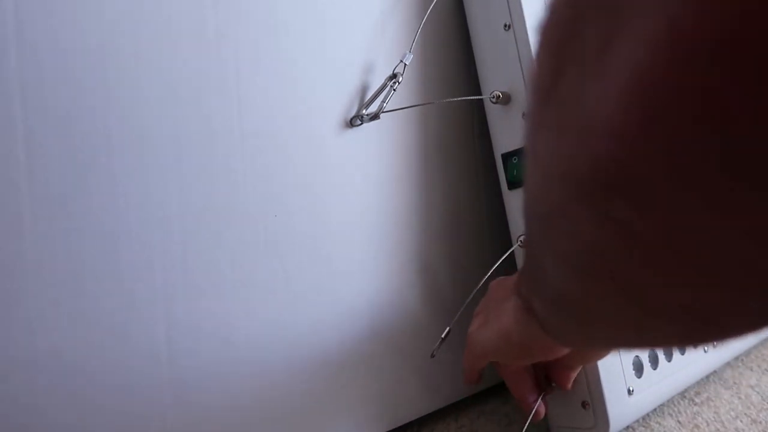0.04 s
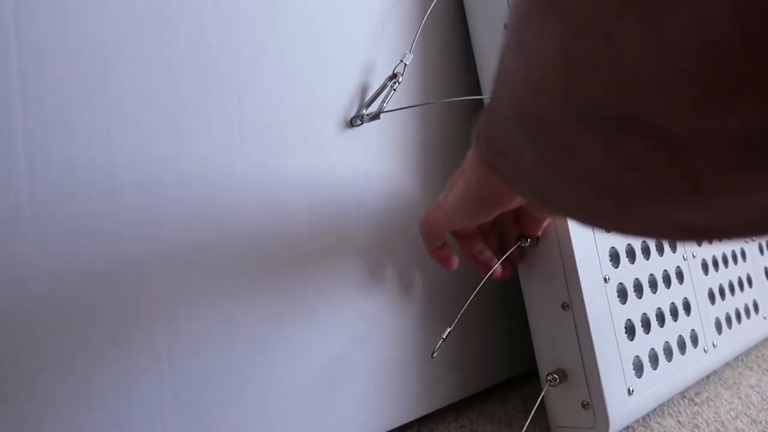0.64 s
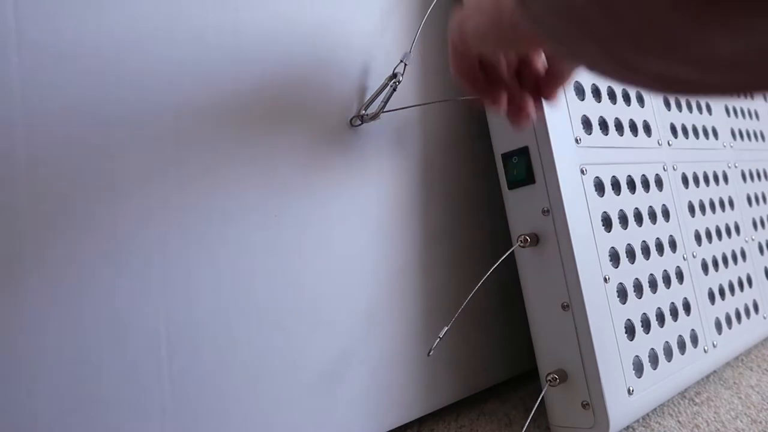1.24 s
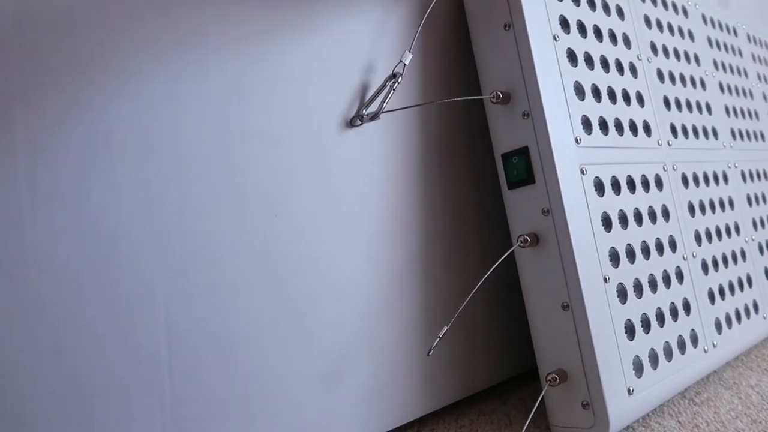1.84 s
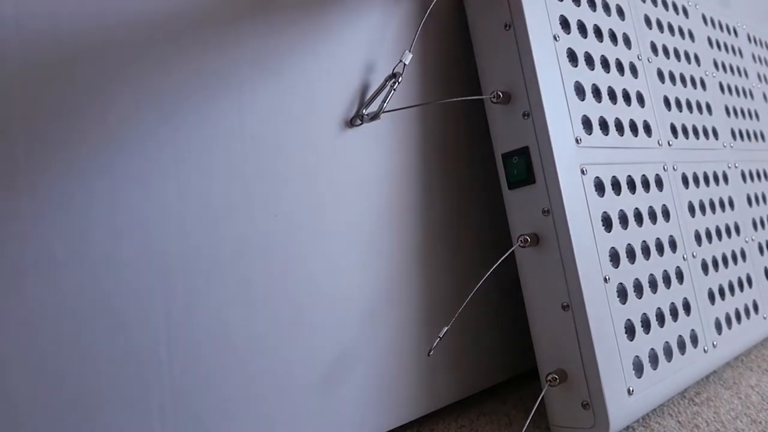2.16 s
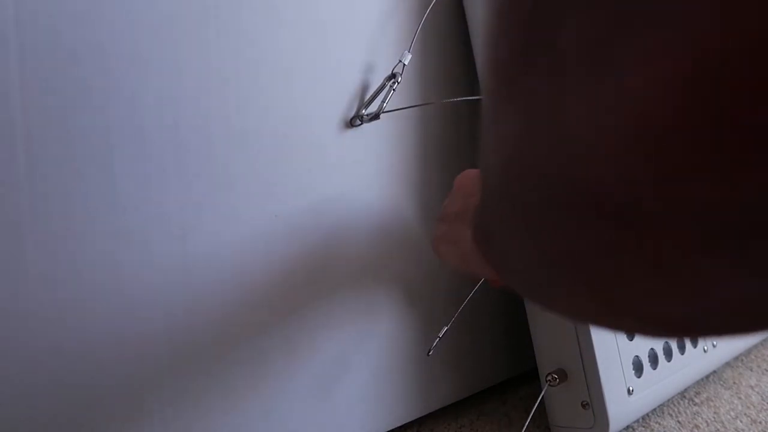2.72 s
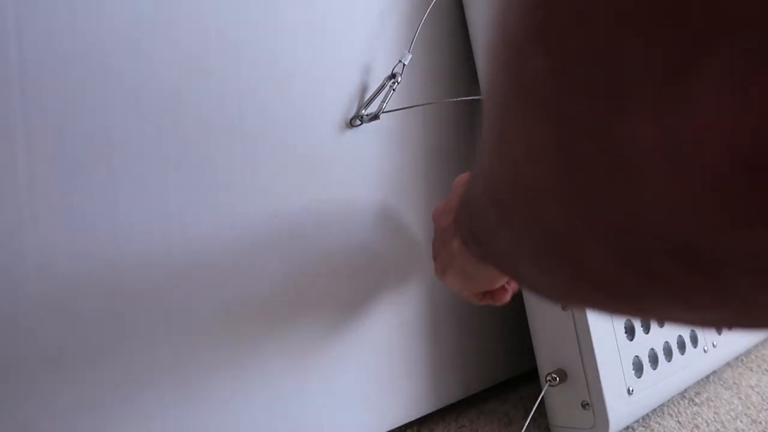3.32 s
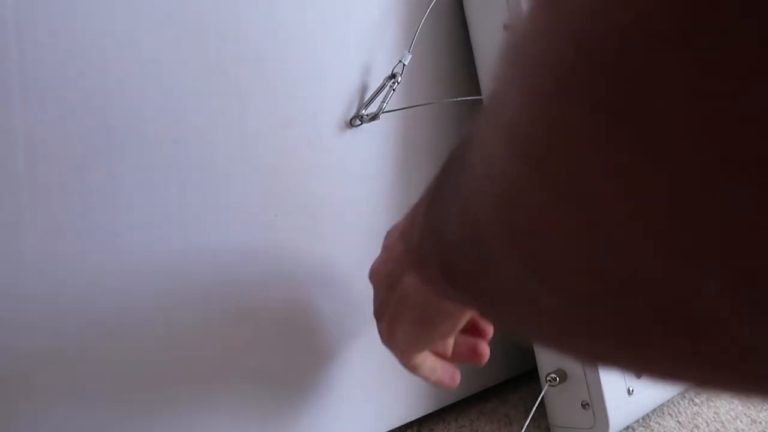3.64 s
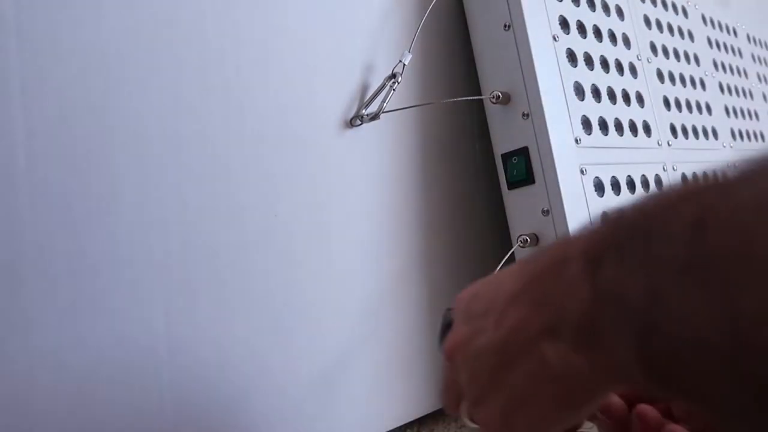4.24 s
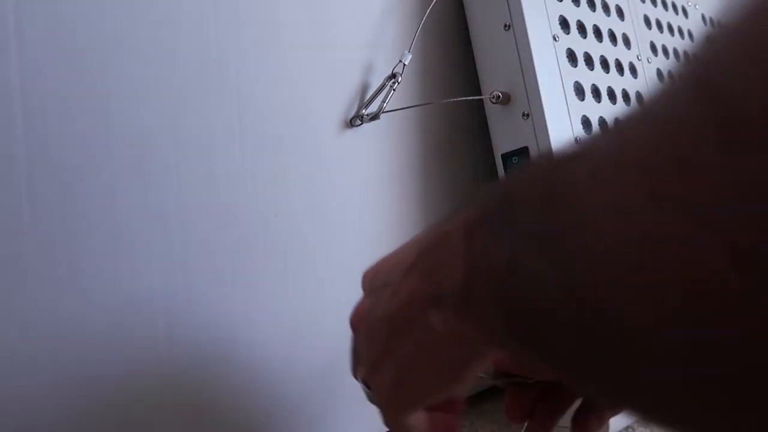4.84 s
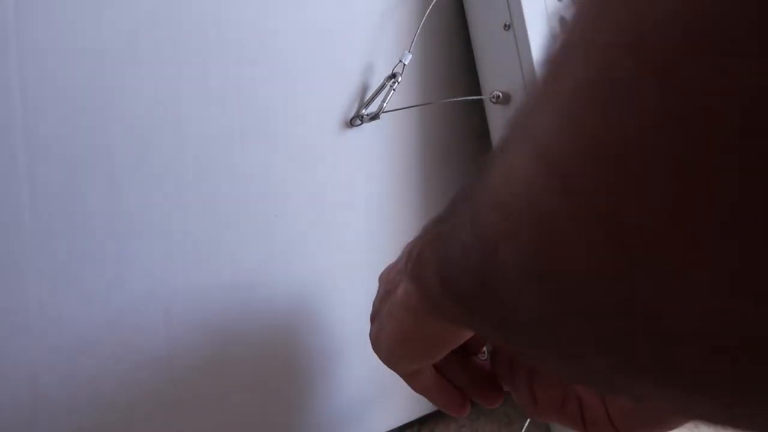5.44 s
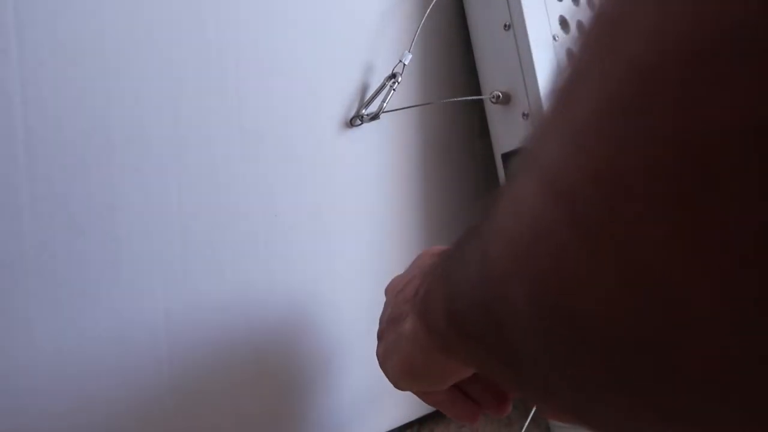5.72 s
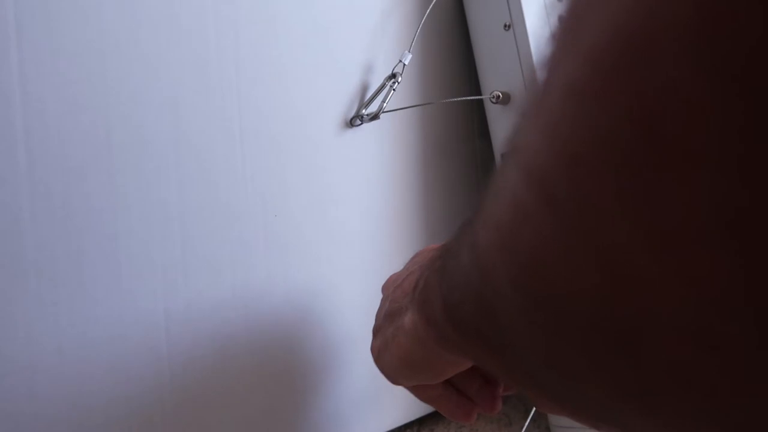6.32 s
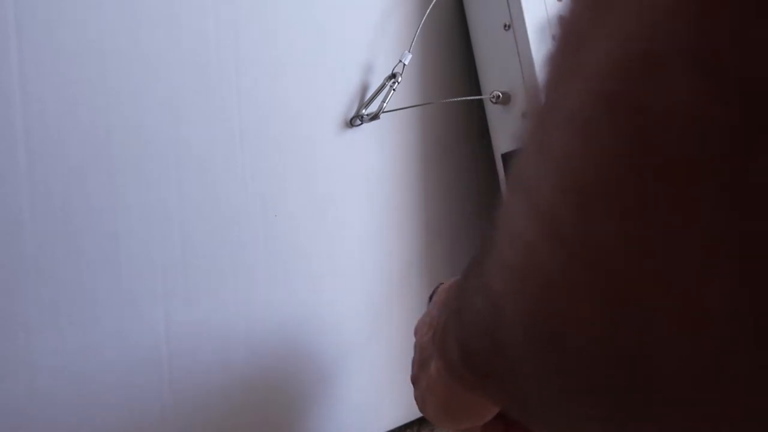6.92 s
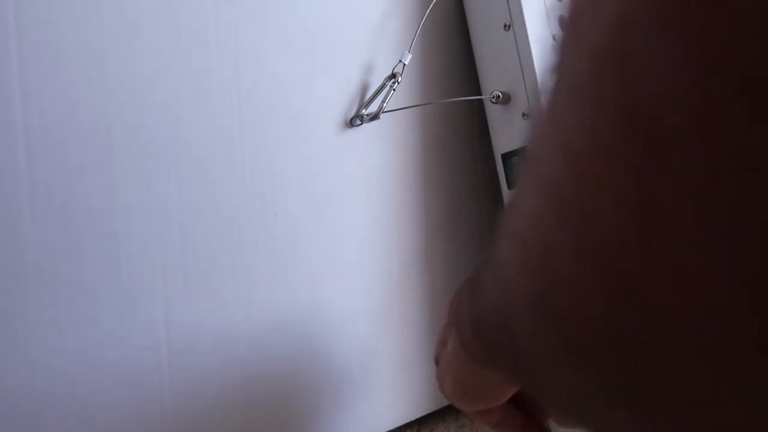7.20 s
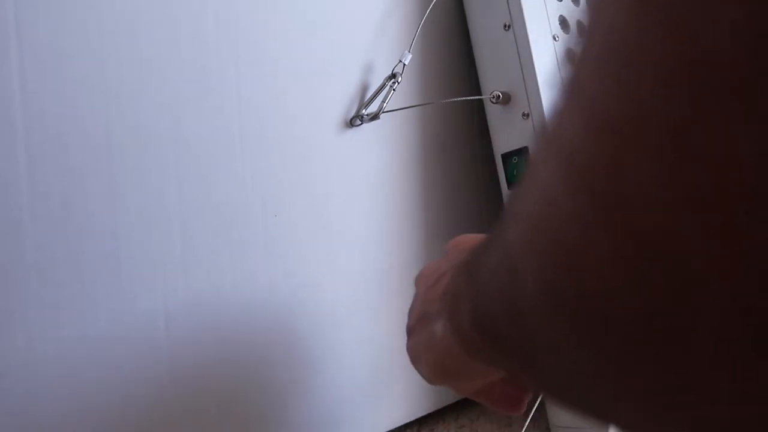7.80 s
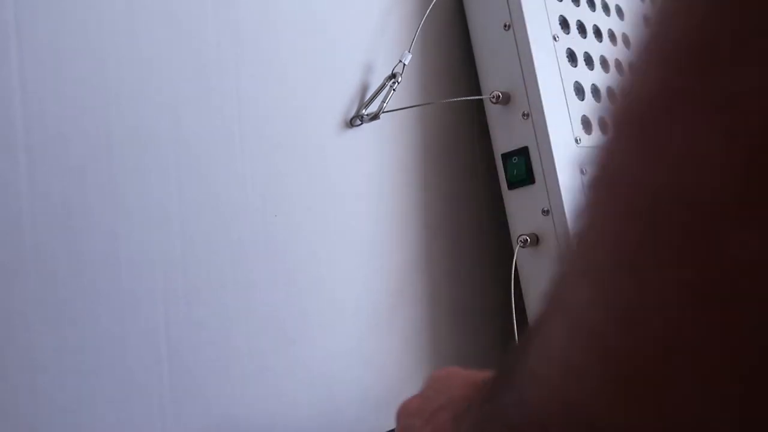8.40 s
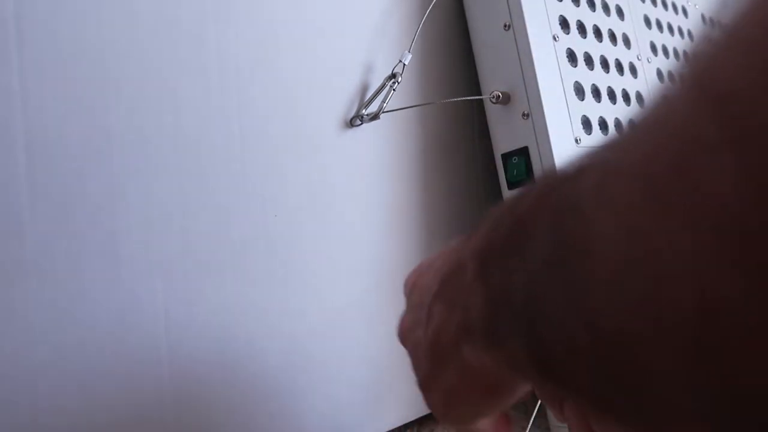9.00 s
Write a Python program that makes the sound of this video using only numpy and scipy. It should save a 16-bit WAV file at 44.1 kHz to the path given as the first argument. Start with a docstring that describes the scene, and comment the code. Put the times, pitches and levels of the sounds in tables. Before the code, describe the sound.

Close by in a small room, steel fittings tap lightly on a metal lamp housing and a link knocks against a hollow wall. A short cluster of clinks and scrapes ends with a finger squeak. The loudest sound follows: one sharp, bright, briefly ringing carabiner snap. Then the fittings keep ticking and knocking unevenly on the sheet metal. A sleeve rustles softly, with faint hiss and far traffic rumble underneath.

```python
"""Steel cables on a lamp housing

Steel cables are clipped to a sheet-metal lamp housing that leans on a wall in a small room.
Their fittings knock and scrape on it and make it ring, small steel parts tick, and a finger squeaks.
A link bumps the hollow wall, and one springy carabiner gate snaps shut close by.
A sleeve rustles; under it all lie room hiss and a low rumble like far traffic."""
import sys
import numpy as np
from scipy import signal
from scipy.fft import rfft, irfft, next_fast_len
from scipy.io import wavfile
from scipy.ndimage import uniform_filter1d, map_coordinates

SR = 44100
rng = np.random.default_rng(int(sys.argv[2]) if len(sys.argv) > 2 else 0)


def persist_wave(psi):
    """Save psi, clipped to +-1, as 16-bit WAV."""
    counts = np.round(np.clip(psi, -1, 1) * 32767).astype(np.int16)
    wavfile.write(sys.argv[1], SR, np.atleast_2d(counts).T)


N = 403515
RING_TIME = np.arange(12288) / SR  # the clock of one short sound, in seconds

# Levels are relative. A mode is one tone an object rings with; t60 is its time to fade by 60 dB.
# Knocks on the housing. Hard ones are brighter, square ones have more punch, and each spot favours
# two tones: t/s, level/dB, hardness/dB, punch/dB, low f/Hz, high f/Hz
KNOCKS = [(.042, -53, 0, -4, 650, 2200), (.078, -51.5, 1, -7, 700, 2200),
          (.967, -43.5, -1.5, -9, 600, 2280), (1.179, -51, -20, 1, 735, 2300),
          (3.073, -49, -9, 4, 400, 1530), (3.154, -33.5, -1, -2, 875, 2300),
          (3.197, -42.5, 3, -5, 1150, 1470), (3.301, -40.5, -5, 0, 715, 2400),
          (3.339, -38.5, -9, -8, 754, 2400), (3.413, -30.5, -4.5, -9, 765, 1740),
          (3.42, -33, -20, -12, 600, 1680), (3.446, -38.5, -9, -10, 430, 2300),
          (3.494, -36.5, -1.5, -3, 960, 1640), (3.5, -36, -3, -6, 810, 1700),
          (3.56, -42.5, 5, -11, 620, 2510), (3.668, -41, -22, 4, 700, 1800),
          (3.801, -40.5, -1, -1, 597, 1420), (3.951, -47.5, 6.5, -14, 600, 1460),
          (4.035, -47, -5, 4, 705, 1440), (5.272, -39, -2.5, -2, 970, 1670),
          (5.385, -42, -11, -2, 765, 2300), (5.842, -46.5, -13, 0, 694, 2300),
          (5.999, -44.5, -1.5, -8, 935, 1650), (6.038, -33, -4.5, -5, 970, 1680),
          (6.058, -36, -6, 1, 1000, 1650), (6.078, -37, -4, 6, 917, 1400), (6.093, -40, -2, 0, 800, 2250),
          (6.279, -48.5, -7, -4, 950, 1400), (6.302, -49, 2.5, -1, 1100, 2500),
          (6.36, -34, -7, 5.5, 690, 2250), (6.377, -39.5, -14, -3, 706, 1670),
          (6.501, -41.5, -6.5, -2, 790, 2300), (6.798, -41, -9, 0, 720, 2300),
          (6.874, -46.5, -3.5, 2, 726, 1440), (7.06, -34, -1, 6.5, 940, 2380),
          (7.173, -38, -8.5, -0.5, 870, 1400), (7.31, -44.5, -10, 1, 700, 2230),
          (7.456, -34.5, -2.5, -15, 770, 1690), (7.46, -34, 5.5, -6, 563, 1650),
          (7.711, -34.5, 0, 9.5, 744, 2550), (7.855, -51, 6.5, -3, 900, 2300),
          (7.947, -36.5, -0.5, 2.5, 725, 2540), (8.021, -41, -2.5, 5, 800, 2230),
          (8.037, -39, 0, 0, 694, 2300), (8.056, -45, -3, -6, 750, 2250), (8.077, -43, 4.5, -1, 700, 1690),
          (8.095, -46, -3, 4, 850, 2250), (8.368, -38, -0.5, -2, 1100, 1870),
          (8.378, -49, 1, -1, 910, 1760), (8.484, -46, -8, -1, 655, 1400),
          (8.53, -40.5, -3, 3.5, 644, 2250), (8.548, -39.5, -2.5, -12, 1140, 1380),
          (8.734, -54, -10, -4, 900, 2230), (8.794, -49.5, -14, 4, 510, 1400),
          (9.017, -45, -17, -1, 730, 2070), (9.068, -52, -14, -6, 590, 1400),
          (9.101, -43.5, -7.5, -12, 640, 2550)]
# Drags over the housing: t/s, length/s, level/dB, hardness/dB, low f/Hz, high f/Hz
SCRAPES = [(0.035, .082, -55.5, -3, 640, 1700), (3.174, .032, -41, 3, 750, 2280),
           (3.316, .025, -48, -0.5, 750, 2400), (3.407, .022, -35.5, -2, 750, 2130),
           (3.438, .014, -43, -7, 560, 1450), (3.562, .014, -48, 8, 700, 2550),
           (3.956, .02, -45, -0.5, 700, 2300), (5.513, .012, -56.5, 3.5, 1100, 1700),
           (5.564, .02, -56.5, -1.5, 1100, 1450), (5.628, .04, -58, 6, 1100, 2280),
           (5.712, .01, -47, -6, 950, 1380), (5.737, .055, -48, -0.5, 1060, 1470),
           (6.061, .012, -33.5, -8, 560, 2230), (6.308, .045, -49, -3, 1100, 2250),
           (6.463, .029, -44.5, -12, 850, 1400), (6.804, .012, -49, 3, 720, 2130),
           (7.019, .028, -43.5, -9, 750, 1400), (7.075, .025, -41, -7, 1080, 1420),
           (7.193, .022, -41, -8, 800, 2250), (7.291, .017, -45.5, -1.5, 720, 2160),
           (7.743, .038, -42.5, 5, 900, 1730), (8.031, .09, -41.5, 0, 700, 2280),
           (8.369, .014, -37, 0.5, 523, 1840), (8.497, .03, -49, 1, 1100, 2250),
           (8.538, .028, -46.5, 2.5, 650, 2300), (8.563, .03, -58, -10, 650, 2280),
           (8.681, .07, -57, 0, 750, 2300), (8.837, .03, -46.5, 1, 700, 2290),
           (8.888, .04, -45.5, 0, 555, 2280)]
HOUSING_MODES = [(390.4, -8.5, 0.16), (447, -12, 0.17), (570.6, -13.5, 0.28), (673.4, 0.5, 0.085),
                 (742.6, 5, 0.087), (921, -3, 0.12), (1105, -12, 0.2), (1248, -10.5, 0.17),
                 (1414, -15, 0.23), (1633, -22, 0.15), (1700, -13, 0.17), (1826, -22, 0.18),
                 (2226, -10, 0.14), (2575, -8.5, 0.057)]  # the sheet metal's ring: f/Hz, level/dB, t60/s
CLATTER_SPECTRUM = [(150, -15), (300, -9), (410, -2), (520, 1), (750, 0), (1100, -3), (1480, -8),
                    (1700, -2.5), (2000, -10), (2500, -6.5), (3300, -14.5), (5000, -18.5), (8000, -21),
                    (15000, -34)]  # its crowded modes plus a fitting's click: f/Hz, level/dB
FITTING_MODES = [(.76, 2, 0.033), (0.952, -0.5, .05), (1, 0, 0.078), (1.04, -1.5, 0.046),
                 (1.22, -2.5, 0.068), (1.42, -11.5, 0.058), (1.74, -9.5, 0.05)]  # a small steel part's ring: multiple of its pitch, level/dB, t60/s

# Steel touches steel. Loose parts ring more, sharp edges sparkle:
# t/s, level/dB, ring/dB, sparkle/dB, pitch f/Hz, contact/s
TICKS = [(0.042, -71, 19, -8, 3290, 0.01), (.078, -67.5, 16.5, -8, 2790, .011),
         (1.669, -74.5, 17, -8, 3690, .004), (1.711, -74, 15, -8, 3690, .004),
         (1.789, -74, 15, -8, 3690, .004), (3.1537, -47, -17, -10, 3600, 0.013),
         (3.409, -53, 7.5, -11, 5350, 0.026), (3.421, -52.5, 8, -1, 3230, 0.022),
         (3.56, -47, 5.5, -3, 3900, 0.037), (3.801, -60, 13.5, -4, 2730, .011),
         (3.9505, -47.5, -1.5, -8, 3750, 0.011), (4.31, -75, 23, -8, 3750, .004),
         (4.351, -76, 14, -8, 3690, .004), (6.036, -62.5, 13, -10, 3500, .008),
         (6.075, -56, 4, -9, 3800, 0.013), (6.278, -57.5, -5, -4, 3400, .008),
         (6.5028, -37.5, -15, -3, 4700, 0.0033), (7.06, -46, -3, -1, 2660, 0.009),
         (7.4596, -50, 10.5, -9, 2850, 0.017), (7.682, -56, 9.5, -9, 2700, .006),
         (7.7115, -37, 4, -11, 4100, 0.01), (7.8125, -44.5, -13, -13, 4300, 0.0076),
         (7.9107, -55, -2, -3, 3600, .007), (7.9476, -43, -1.5, 0, 3800, 0.0056),
         (8.0394, -51.5, -3, -7, 4700, 0.013), (8.049, -55.5, 7, -5, 3850, 0.032),
         (8.076, -62, 9, -8, 3700, .015), (8.368, -51, 14.5, 1, 3040, .02), (8.379, -57, 12, 6, 3050, .015),
         (8.531, -62, 7, -10, 4200, .015), (8.539, -66, 16, -10, 3150, .02), (8.89, -56, 4, -7, 4300, .011)]
TICK_SPECTRUM = [(3000, 0), (5500, -1), (7000, 3), (9500, 5), (11000, 2.5), (13000, -1), (14500, -4),
                 (16000, -29)]  # the click of steel on steel: f/Hz, level/dB
EDGE_MODES = [(12200, 4, .09), (12450, -5, .07)]  # a sharp edge's thin ring: f/Hz, level/dB, t60/s

HINGE_SQUEAK = [(4.5, 9400, -95), (4.56, 9650, -80), (4.62, 9880, -80), (4.68, 10000, -78),
                (4.73, 9500, -78), (4.8, 9300, -79), (4.86, 9200, -90)]  # the carabiner gate is pressed open: t/s, f/Hz, level/dB
GATE_HITS = [(4.8991, -9.2, .00026), (4.9004, -11.3, .0003), (4.9020, -20, .0007)]  # the gate strikes and chatters: t/s, level/dB, spread/s
GATE_ECHOES = [(4.9105, -20, .00018), (4.9238, -31, .0008)]  # near surfaces return the treble: t/s, level/dB, spread/s
SNAP_SPECTRUM = [(150, -8), (450, -10.5), (900, -10.5), (1800, -17.5), (2300, -14), (3200, -25.5),
                 (4200, -4.5), (5000, -10), (5600, 0), (6500, -6.5), (8500, 4), (9800, 5.5), (11100, -9.5),
                 (13200, 5), (16000, -15)]  # the snap itself: f/Hz, level/dB
SNAP_TAIL_SPECTRUM = [(1200, -41), (1900, -16), (2200, -8), (2800, -13), (3800, -3), (5000, -6.5),
                      (5800, -2.5), (8000, 2), (9300, 1), (11200, 2.5), (13000, -7), (15300, -16)]  # the room's answer to it: f/Hz, level/dB
SNAP_BALANCE = [(200, 3), (400, 29), (700, 8), (1300, 13), (2400, 3.5), (4400, -2), (8000, -2), (15000, 0)]  # its thud is mainly on the left: f/Hz, left minus right/dB
CARABINER_MODES = [(2170, -2, 0.22), (2290, -5, 0.091), (2950, -13.5, .25), (3500, -9, 0.13),
                   (3930, -5, 0.14), (4350, -3.5, 0.13), (4759, -2, .12), (5523, 3, 0.2), (6080, -5, .22),
                   (6460, -4, .2), (6977, 3, 0.16), (7558, -3, 0.16), (8100, 1, 0.14), (8300, 0, .14),
                   (8500, 8, .14), (8840, 4, .15), (9450, 6, 0.139), (9500, 8, 0.15), (10100, -3, 0.12),
                   (13200, 10, .11)]  # the carabiner's ring: f/Hz, level/dB, t60/s

BUMPS = [(1.902, -34), (1.909, -24), (1.919, -30.5)]  # a hanging link swings against the wall: t/s, level/dB
WALL_MODES = [(410, -11.5, 0.14), (491, -20, .15), (943, -2.5, 0.16), (1011, 0, 0.051), (1093, 4, 0.072),
              (1160, -6, .04), (1225, -9, 0.19), (1378, -9, 0.17), (1450, -14, 0.16), (1624, -10, 0.19),
              (1670, -14.5, 0.22), (2430, -15, 0.079), (2720, -18, 0.059), (3750, -16, 0.045)]  # the hollow wall and the link: f/Hz, level/dB, t60/s
BOOM_MODES = [(195, -2, 0.19), (237, -1.5, 0.21), (254, -4, 0.2)]  # the wall's slow bending: f/Hz, level/dB, t60/s
FINGER_SQUEAK = [(3.84, 740, -73), (3.86, 783, -42.5), (3.875, 982, -48), (3.9, 1050, -54),
                 (3.92, 1100, -75)]  # a finger slips with a rising tone: t/s, f/Hz, level/dB
ARM_MOVES = [(0, 0.19, -52), (3.097, 0.081, -50.5), (3.625, 0.36, -51.5), (3.873, 0.25, -56.5),
             (5.66, 0.29, -76), (6.39, 0.16, -55.5), (7.11, 0.23, -60), (7.76, 0.17, -48),
             (8.085, 0.12, -54), (8.487, 0.37, -54), (8.92, 0.26, -55.5)]  # the sleeve brushes past: middle t/s, length/s, level/dB
SLEEVE_SPECTRUM = [(250, -25), (450, 5.5), (740, 5.5), (1100, -3), (1700, -2), (2400, -6.5), (3200, -11),
                   (8000, -23.5), (14000, -33.5)]  # rubbing heard through the housing: f/Hz, level/dB

# Far engines: middle t/s, length/s, firing f/Hz, glide/(Hz per s), level/dB, overtones/dB
ENGINES = [(0.283, 0.51, 58.8, 14.5, -43.5, -85), (1.3, 0.39, 60.8, -10.5, -64, -83),
           (2.6, 0.46, 110, 0, -50, -95), (5.857, 0.52, 55.4, 0, -65, -55.5),
           (7.96, 0.3, 34.15, 25.5, -43.5, -90), (8.047, 0.38, 60.6, 0, -48.5, -88),
           (9.087, .8, 65, 9.5, -45.5, -86)]
RUMBLE_SPECTRUM = [(8.8, -28), (15, -5.5), (49, -3), (110, -8), (140, -31), (240, -120)]  # the deep rumble: f/Hz, level/dB
ROOM_TONE_SPECTRUM = [(44, -33), (75, -5.5), (113, -1.5), (140, -10), (189, -8), (243, -11.5), (289, -10),
                      (323, -15.5), (399, -13.5), (600, -20.5), (780, -36), (1320, -120)]  # the room's low murmur: f/Hz, level/dB
HISS_SPECTRUM = [(200, -29), (400, -27), (700, -8), (1200, -9.5), (2000, -12), (3000, -14), (4200, -16),
                 (5000, -18.5), (8000, -23.5), (12500, -29), (13200, -27.5), (15000, -56)]  # the room's hiss: f/Hz, level/dB
ROOM_DECAY = [(200, 0.17), (600, 0.21), (1500, 0.25), (4000, 0.17), (10000, 0.23), (14000, 0.17)]  # how long the room echoes: f/Hz, t60/s

# How alike left and right are for sound from each direction: f/Hz, likeness (-1 opposite, 1 same)
ALL_AROUND = [(50, 1), (100, .98), (180, .9), (270, .6), (500, -.05), (3000, -.15), (9000, -.15),
              (13000, -.5)]
IN_FRONT = [(300, 0.9), (700, 0.98), (1600, 0.92), (3000, 0.78), (5500, 0.63), (8000, 0.42), (12000, 0.11)]
TO_THE_SIDE = [(300, 0.97), (900, 0.3), (2100, 0.37), (3000, -0.38), (4000, 0.98), (5200, 0.92),
               (6500, 0.12), (8000, -0.14), (9500, -0.72), (13000, -0.72)]


def knocks(gain_db=-0.63, graze_db=-17, graze_s=0.003):
    """A fitting grazes the housing, lands on it and slides for a moment."""
    out = np.zeros((2, N))
    lead = round(graze_s * SR) + 1
    for t, level, hardness, punch_db, low_hz, high_hz in KNOCKS:
        force = np.pad(landing_force(), ((0, 0), (lead, 0)))
        force[0, 0] = amp(graze_db)
        add(out, t - .001 - lead / SR, ring_housing(force, level + gain_db, hardness, low_hz, high_hz))
        add(out, t, amp(level + gain_db + punch_db) * punch(low_hz))
    return out


def landing_force(slide_s=0.005006, slip_db=-13, slips=4):
    """One push as the fitting lands, then a few weaker slips."""
    force = np.zeros(SR // 20)
    slip_times = rng.uniform(size=slips) * slide_s
    force[(slip_times * SR).astype(int)] = amp(slip_db) * rng.choice([-1, 1], slips)
    force[0] = 1
    return force[None]


def punch(hz):
    """The struck spot of sheet metal swings for a few cycles."""
    return unit_peak(np.sin(2 * np.pi * hz * RING_TIME) * fade(0.017) * rise(0.0005))


def ring_housing(force, level, hardness, low_hz, high_hz, clink_db=-12):
    """A force rings the housing and the fitting; a harder contact brings out their high tones."""
    onset = rise(0.0021)
    contact = noise(CLATTER_SPECTRUM, IN_FRONT) * fade(0.019)
    contact += amp(-16) * room_tail(CLATTER_SPECTRUM, IN_FRONT, build_s=.004)
    housing = contact + amp(-10) * ring(HOUSING_MODES, scatter_db=4.5, detune=.005)
    fitting = unit_rms(band(contact, 2590, "high"))
    fitting += amp(-7) * fitting_ring(hz=3148, scatter_db=0.5, detune=.04)
    housing = signal.fftconvolve(housing * onset, force, axes=1)
    fitting = signal.fftconvolve(fitting * onset, force, axes=1)
    body = unit_peak(band(resonate(housing, low_hz), 1300, "low"))
    clack = unit_peak(band(resonate(housing, high_hz), [1300, 2800], "band"))
    # The spot's favoured high tone sings on after the clack.
    singing = ring([(high_hz, 0, 0.11)], scatter_db=0) * onset
    singing = signal.fftconvolve([singing], force, axes=1)
    clack = unit_peak(clack + amp(-22) * unit_peak(singing))
    clink = unit_peak(band(fitting, 6000, "low"))
    return amp(level) * (body + amp(hardness) * (clack + amp(clink_db) * clink))


def fitting_ring(hz, scatter_db, detune):
    """A small steel part rings with several tones around its pitch."""
    modes = [(multiple * hz, db, t60) for multiple, db, t60 in FITTING_MODES]
    return unit_rms(ring(modes, scatter_db, detune))


def scrapes(gain_db=-1.23):
    """A dragged fitting or cable chatters on the housing."""
    out = np.zeros((2, N))
    for t, length, level, hardness, low_hz, high_hz in SCRAPES:
        force = drag_force(length)
        add(out, t, ring_housing(force, level + gain_db, hardness, low_hz, high_hz, clink_db=-10))
    return out


def drag_force(length_s, slips_per_s=180, scatter_db=1.5):
    """Dragged metal sticks and slips, giving pushes of uneven size at uneven times."""
    size = SR // 5
    slipping = (rng.uniform(size=size) < slips_per_s / SR) & (np.arange(size) < length_s * SR)
    strength = amp(scatter_db * rng.standard_normal(size))
    force = slipping * strength * rng.choice([-1, 1], size)
    force[0] = 1
    return force[None]


def ticks(wall_echo_s=.0114, wall_echo_db=-13):
    """Small steel parts touch: a bright click, the part's own ring and an echo off the wall."""
    out = np.zeros((2, N))
    onset = rise(0.0008)
    for t, level, ring_db, sparkle_db, hz, contact_s in TICKS:
        direct = unit_peak(noise(TICK_SPECTRUM, IN_FRONT) * (fade(contact_s) - fade(contact_s / 2)))
        room = unit_rms(room_tail(TICK_SPECTRUM, IN_FRONT, build_s=0.0058))
        touch = direct + amp(-11) * np.std(direct) * room
        tick = amp(1) * unit_peak(band(touch, [5000, 11000], "band"))
        rasp = noise(CLATTER_SPECTRUM, IN_FRONT) * fade(0.015)
        rasp += amp(-13) * room_tail(CLATTER_SPECTRUM, IN_FRONT, build_s=0.0024)
        rasp = unit_rms(resonate(band(rasp, 3100, "high"), hz))
        fitting = (rasp + fitting_ring(hz, scatter_db=-1.5, detune=0.0028)) * onset
        clink = amp(ring_db - 1) * unit_peak(band(fitting, 6000, "low", order=5))
        edge = amp(-21) * ring(EDGE_MODES, scatter_db=3, detune=.004) * onset
        sparkle = amp(sparkle_db) * (unit_peak(band(touch, 11000, "high")) + edge)
        add(out, t, amp(level) * (tick + sparkle + clink))
        add(out, t + wall_echo_s, amp(level + wall_echo_db) * (tick + sparkle))
    return out


def carabiner(ring_db=-29, room_db=-27.5, lead_s=.005):
    """The springy gate squeaks open and snaps shut; the steel and the room ring on."""
    out = np.tile(squeak(HINGE_SQUEAK, rough_db=3, rough_hz=75), (2, 1))
    for t, level, spread_s in GATE_HITS:
        add(out, t - lead_s, amp(level) * unit_peak(gate_click(spread_s, lead_s), window=44))
    for t, level, spread_s in GATE_ECHOES:
        echo = band(gate_click(spread_s, lead_s), 4000, "high")
        add(out, t - lead_s, amp(level) * unit_peak(echo, window=44))
    steel = np.array([ring(CARABINER_MODES, scatter_db=2) for side in range(2)])
    room = room_tail(SNAP_TAIL_SPECTRUM, TO_THE_SIDE, build_s=0.0035)
    add(out, GATE_HITS[0][0], amp(ring_db) * steel + amp(room_db) * room)
    return out


def gate_click(spread_s, lead_s):
    """One stereo click after lead_s, with each frequency early or late by about spread_s."""
    hz = np.fft.rfftfreq(2048, 1 / SR)
    delay_s = lead_s + spread_s * map_coordinates(rng.standard_normal(60), [hz / 500])
    sides = np.array([[1], [-1]])  # left, right
    phase = sides * stereo_angle(TO_THE_SIDE, hz) - 2 * np.pi * np.cumsum(delay_s) * hz[1]
    level = value_at(SNAP_SPECTRUM, hz) + sides * value_at(SNAP_BALANCE, hz) / 2
    return irfft(amp(level) * np.exp(1j * phase))


def wall_bumps(gain_db=-4.0, scrape_db=-10, room_db=-15, boom_db=-30):
    """A link bounces on the hollow wall, whose low boom takes a moment to build."""
    out = np.zeros((2, N))
    for t, level in BUMPS:
        wall = ring(WALL_MODES, scatter_db=3, detune=.004)
        scrape = amp(scrape_db) * noise(CLATTER_SPECTRUM, IN_FRONT) * fade(0.045)
        room = amp(room_db) * room_tail(CLATTER_SPECTRUM, IN_FRONT, build_s=0.033)
        add(out, t, amp(level + gain_db) * unit_peak((wall + scrape + room) * rise(0.00024)))
    add(out, BUMPS[1][0], amp(boom_db) * ring(BOOM_MODES, scatter_db=0) * rise(0.023))
    return out


def finger(room_db=-12):
    """Skin squeaks on the sheet metal and the room answers."""
    direct = squeak(FINGER_SQUEAK, rough_db=2.0, rough_hz=110.7)
    tail = room_tail(CLATTER_SPECTRUM, IN_FRONT, build_s=.004)
    room = signal.fftconvolve(direct[None], tail, axes=1)[:, :N]
    return direct + amp(room_db) * np.std(direct) * unit_rms(room)


def squeak(path, rough_db, rough_hz):
    """Sticking and slipping makes a gliding tone, unsteady in level and pitch."""
    times, pitches, levels = np.transpose(path)
    now = np.arange(N) / SR
    level = np.interp(now, times, levels) + rough_db * wobble(90)
    hz = np.interp(now, times, pitches) + rough_hz * wobble(300)
    sounding = (now > times[0]) & (now < times[-1])
    return amp(level) * np.sin(2 * np.pi * np.cumsum(hz) / SR) * sounding


def sleeve(rest_db=-66, grain_db=2):
    """Cloth rustles faintly all the time and swells with each move of the arm."""
    power = amp(rest_db) ** 2 + sum((amp(db) * swell(t, length)) ** 2 for t, length, db in ARM_MOVES)
    return np.sqrt(power) * amp(grain_db * wobble(60)) * noise(SLEEVE_SPECTRUM, IN_FRONT, size=N)


def traffic(octave_db=-19, waver_hz=0.31, waver_db=1.5):
    """Far engines drone as they swell and fade, some gliding in pitch."""
    out = np.zeros(N)
    for t, length, hz, glide, level, overtones_db in ENGINES:
        firing_hz = hz + glide * np.clip(np.arange(N) / SR - t, -length, length)
        phase = 2 * np.pi * np.cumsum(firing_hz + waver_hz * wobble(6.6)) / SR
        drone = amp(level) * (np.sin(phase) + amp(octave_db) * np.sin(2 * phase))
        drone += amp(overtones_db) * (np.sin(4 * phase) + .5 * np.sin(5 * phase))
        out += swell(t, length) * drone
    return out * amp(waver_db * wobble(9.3))


def background(rumble_db=-53, tone_db=-53, hiss_db=-58):
    """Low rumble and room tone drift a little under a nearly steady hiss."""
    rumble = amp(rumble_db + 1.4 * wobble(2.53)) * noise(RUMBLE_SPECTRUM, ALL_AROUND, size=N)
    tone = amp(tone_db + 0.76 * wobble(6.5)) * noise(ROOM_TONE_SPECTRUM, ALL_AROUND, size=N)
    hiss = amp(hiss_db + 0.23 * wobble(2.63)) * noise(HISS_SPECTRUM, ALL_AROUND, size=N)
    return rumble + tone + hiss


def room_tail(spectrum, likeness, build_s):
    """The room's answer to a click builds up, then each frequency fades at its own pace."""
    hz, t, slices = signal.stft(noise(spectrum, likeness), SR, nperseg=256)
    decay = np.exp(-np.log(1000) * t / value_at(ROOM_DECAY, hz)[:, None])
    tail = signal.istft(slices * decay, SR, nperseg=256)[1]
    return tail[:, :len(RING_TIME)] * rise(build_s)


def ring(modes, scatter_db, detune=0):
    """A struck object's fading tones; scatter_db varies their strength and detune their pitch."""
    hz, db, t60 = np.transpose(modes)[:, :, None]
    gain = amp(db + scatter_db * rng.standard_normal(hz.shape))
    phase = rng.uniform(0, 2 * np.pi, hz.shape)
    hz = hz * (1 + detune * rng.standard_normal(hz.shape))
    tones = gain * np.sin(2 * np.pi * hz * RING_TIME + phase) * fade(t60)
    return np.sum(tones, 0) / np.sqrt(np.sum(gain ** 2) / 2)


def noise(spectrum, likeness, size=len(RING_TIME)):
    """Stereo noise with the given tone colour and left-right likeness."""
    padded = next_fast_len(size)
    hz = np.fft.rfftfreq(padded, 1 / SR)
    angle = stereo_angle(likeness, hz)
    coloured = rfft(rng.standard_normal((2, padded))) * amp(value_at(spectrum, hz))
    mid, side = irfft(coloured * [np.cos(angle), np.sin(angle)], padded)[:, :size]
    return unit_rms(np.array([mid + side, mid - side]))


def stereo_angle(likeness, hz):
    """Turn likeness into an angle: zero when left and right are the same."""
    return np.arccos(np.clip(value_at(likeness, hz), -1, 1)) / 2


def resonate(x, hz, lift_db=5.5, q=4.2):
    """Lift the sound around hz; a higher q makes the lift narrower."""
    return x + (amp(lift_db) - 1) * signal.lfilter(*signal.iirpeak(hz, q, fs=SR), x)


def band(x, hz, kind, order=3):
    """Keep the lows, the highs or a band in between."""
    return signal.sosfilt(signal.butter(order, hz, kind, fs=SR, output="sos"), x)


def rise(seconds):
    """A gain that climbs from 0 towards 1."""
    return 1 - np.exp(-RING_TIME / seconds)


def fade(t60):
    """A gain that falls by 60 dB in t60 seconds."""
    return np.exp(-np.log(1000) * RING_TIME / t60)


def swell(t, length):
    """A bell-shaped gain around time t, above one half for the given length."""
    return .5 ** ((2 * (np.arange(N) / SR - t) / length) ** 2)


def wobble(rate):
    """A smooth curve through rate random values a second."""
    return map_coordinates(rng.standard_normal(int(N * rate / SR) + 4), [np.arange(N) * rate / SR])


def value_at(table, hz):
    """Read between the rows of a frequency table, on a log scale."""
    freqs, values = np.transpose(table)
    return np.interp(np.log(hz + 1), np.log(freqs + 1), values)


def amp(db):
    """Turn decibels into a gain."""
    return 10 ** (np.asarray(db) / 20)


def unit_rms(x):
    """Scale to an average strength (rms) of 1."""
    return x / np.sqrt(np.mean(x ** 2) + 1e-20)


def unit_peak(x, window=176):
    """Scale so that the loudest stretch of window samples has rms 1."""
    power = np.mean(np.atleast_2d(x) ** 2, 0)
    return x / np.sqrt(np.max(uniform_filter1d(power, window)))


def add(track, t, sound):
    """Mix a sound into a stereo track at time t."""
    part = track[:, round(t * SR):][:, :sound.shape[-1]]
    part += sound[..., :part.shape[-1]]


def scene():
    """Mix all the sources in stereo."""
    handling = knocks() + scrapes() + ticks() + finger() + wall_bumps() + carabiner()
    return handling + sleeve() + traffic() + background()


def record(dry):
    """Cut away the very highest treble."""
    top_hz = 15600
    padded = next_fast_len(N + SR // 2)
    hz = np.fft.rfftfreq(padded, 1 / SR)
    return irfft(rfft(dry, padded) / (1 + (hz / top_hz) ** 80), padded)[:, :N]


dry = scene()
out = record(dry)
persist_wave(out)
```